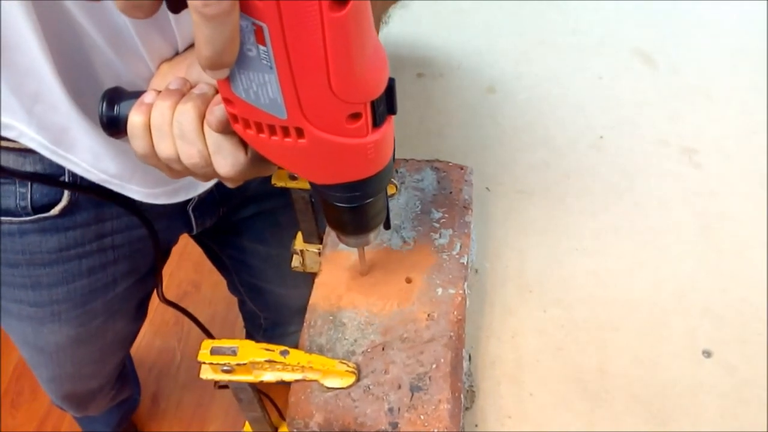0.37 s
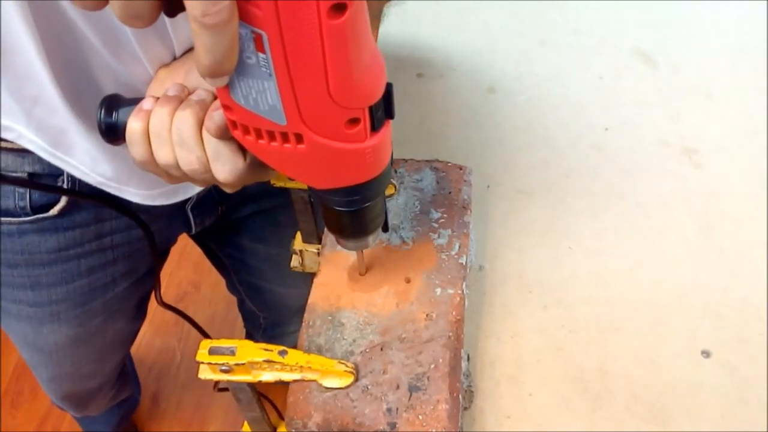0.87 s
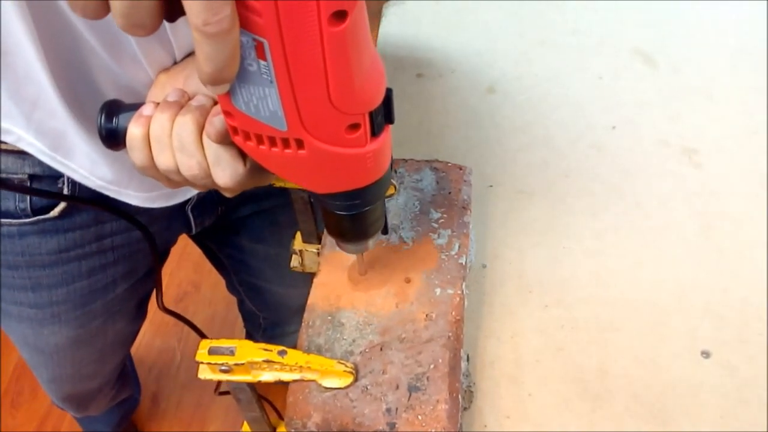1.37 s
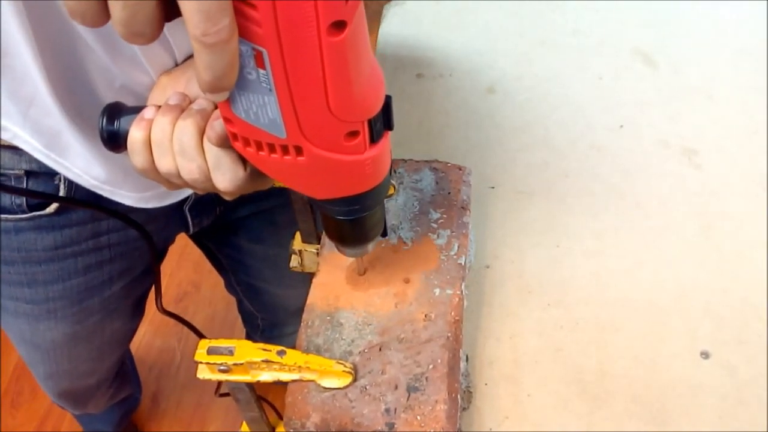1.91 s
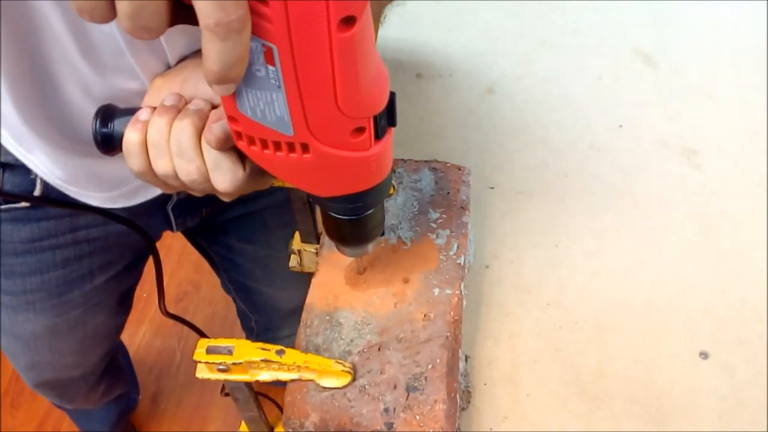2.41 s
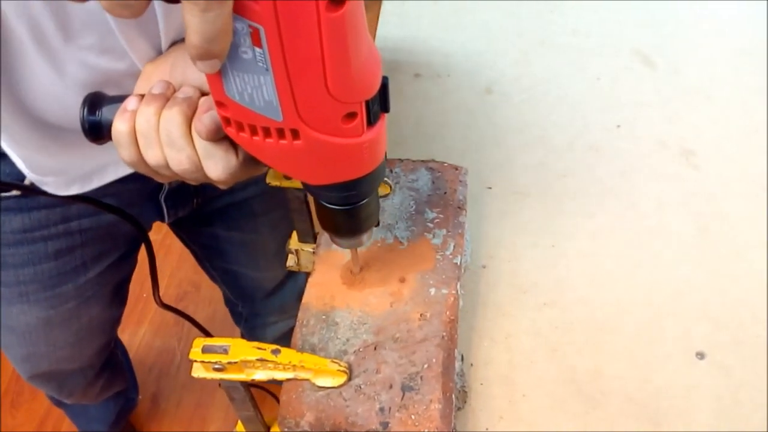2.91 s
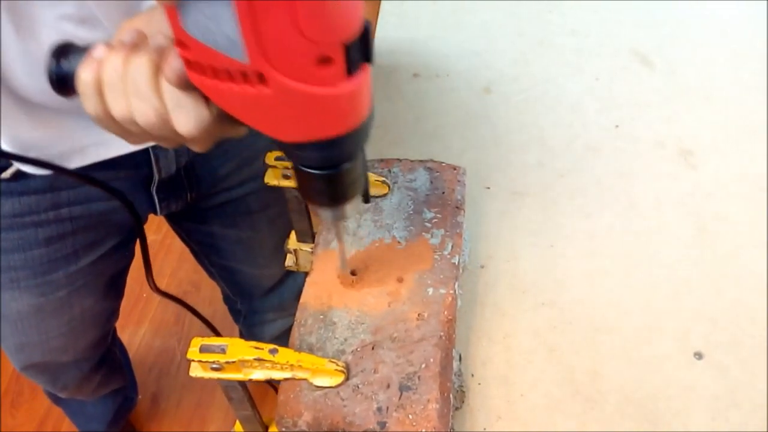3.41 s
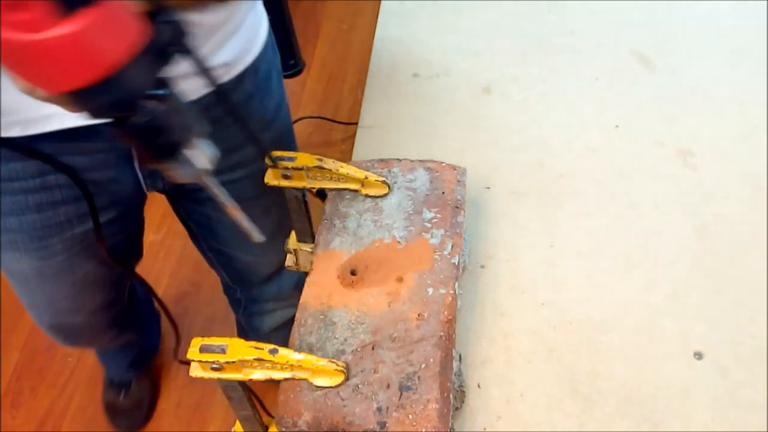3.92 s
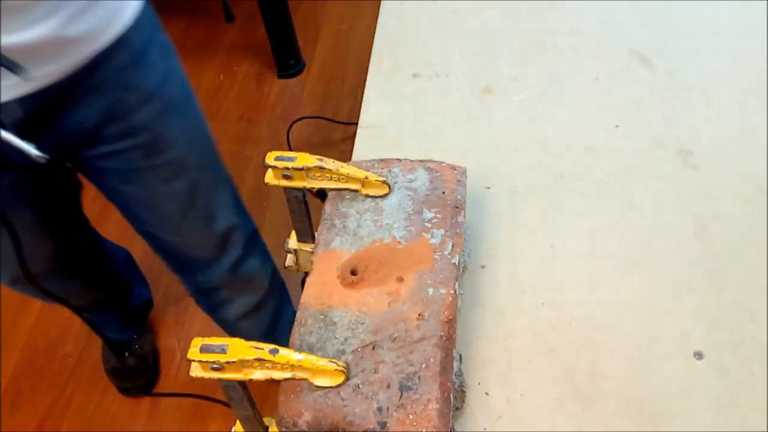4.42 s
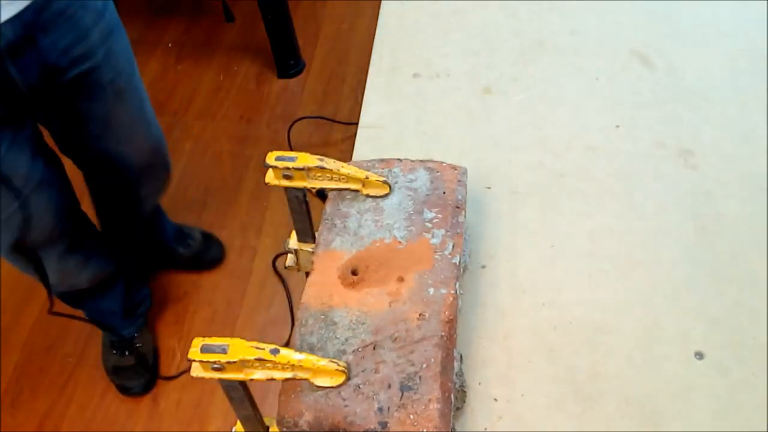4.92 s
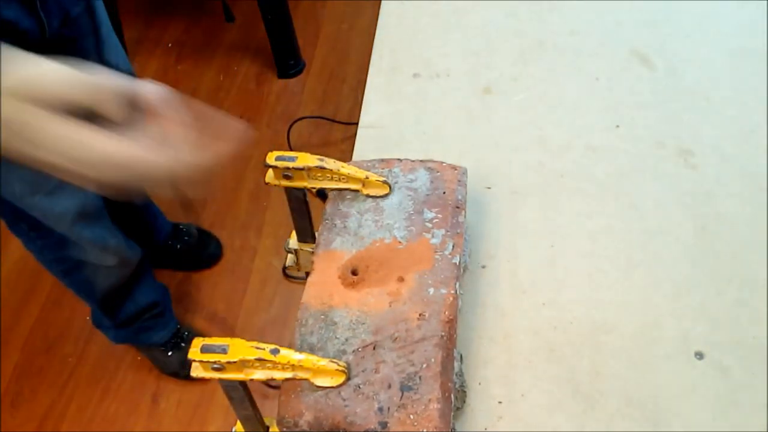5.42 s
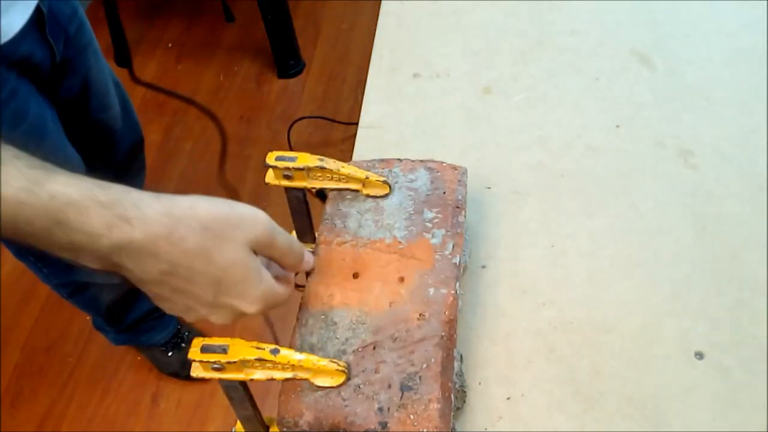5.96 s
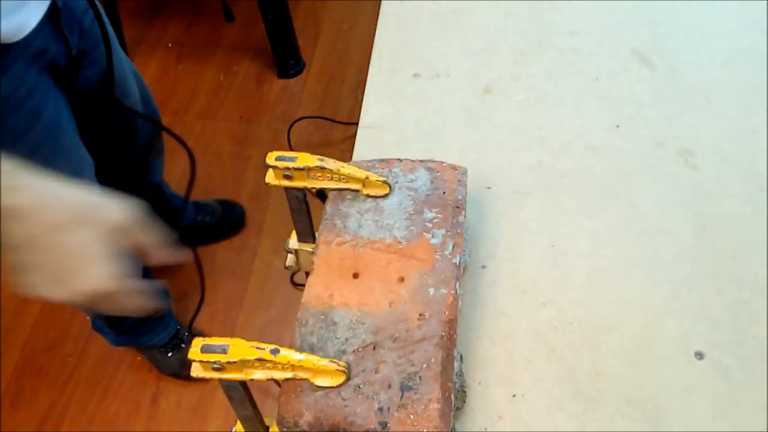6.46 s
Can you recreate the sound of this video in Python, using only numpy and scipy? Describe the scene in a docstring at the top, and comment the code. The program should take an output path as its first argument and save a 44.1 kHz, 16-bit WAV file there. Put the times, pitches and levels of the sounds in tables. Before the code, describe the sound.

Close up in a small, hard room, an electric hammer drill is already boring into brick. Until about 2 s its rapid blows merge into a steady, loud buzzing tone around 510 Hz with overtones, wrapped in bright, gritty grinding; the microphone saturates gently. From 1.9 s the tone rises slightly, breaks up and fades, with the grinding gone by 2.3 s. Between 2.1 and 2.8 s the bit squeals around 5 to 6 kHz, throbbing as it turns, while the lighter motor whirs and speeds up. Shorter, weaker squeaks continue to about 3.4 s as motor speed dips. Then gear whine and airy draught slide downward and fade, with uneven bearing ticks from about 4.3 s until nearly 6 s. Very faint, soft gritty hand strokes come near 5.9 and 6.35 s, the last followed by a faint low swell over quiet building murmur.

```python
"""An electric hammer drill bores into a clamped brick: ratchet blows sing as a steady tone over grinding noise.
The bit is drawn out, squealing against the hole in narrow bands of noise over a faint low hum; the motor's
draught, gears and whines follow its speed as it coasts to rest, slack bearings tick, and a hand sweeps off the
dust in soft strokes of filtered noise, the last followed by a faint, low, murmur-like swell.
A small hard room and a low murmur surround it; the microphone saturates gently."""
import sys
import numpy as np
from scipy import signal
from scipy.fft import rfft, irfft, next_fast_len
from scipy.io import wavfile
from scipy.ndimage import map_coordinates

SR = 44100
rng = np.random.default_rng(int(sys.argv[2]) if len(sys.argv) > 2 else 0)


def materialize(psi):
    """Save the field psi as 16-bit PCM at rate SR to the path in sys.argv[1].

    A 1-D psi becomes a single channel; in a 2-D psi each row is a channel.
    """
    bounded = np.clip(np.atleast_2d(psi).T, -1, 1)
    quanta = np.round(bounded * 32767).astype(np.int16)
    wavfile.write(sys.argv[1], SR, quanta)


def natural_amplitude(level_db):
    """Convert a level in decibels to a linear amplitude factor, elementwise."""
    exponent = np.asarray(level_db, float) / 20
    return 10 ** exponent


N = 289737
TIME = np.arange(N) / SR  # seconds
FULL_HZ = 400  # armature turns per second at which the speed laws give their stated dB


def unit(x):
    """Scaled to rms 1."""
    return x / np.sqrt(np.mean(x ** 2) + 1e-20)


def along(points, hz):
    """Values of (Hz, value) points, interpolated on a log frequency axis."""
    point_hz, values = np.transpose(points)
    return np.interp(np.log(hz + 1), np.log(point_hz + 1), values)


def curves(rows):
    """One value per sample for each column after the time."""
    seconds, *columns = np.transpose(rows)
    return [np.interp(TIME, seconds, column) for column in columns]


def wobble(rate):
    """A smooth random curve, rate knots a second."""
    knots = rng.standard_normal(int(N * rate / SR) + 4)
    return map_coordinates(knots, [TIME * rate])


def bump(peak_s, length_s):
    """A bell-shaped curve that peaks at 1; length_s is its standard deviation."""
    return np.exp(-.5 * ((TIME - peak_s) / length_s) ** 2)


def turns(hz):
    """Phase in radians of a rotation of changing speed."""
    return 2 * np.pi * np.cumsum(hz) / SR


def filtered(x, response):
    """x times a response of frequency, rms 1."""
    size = next_fast_len(N + 8192)
    spectrum = rfft(x, size) * response(np.fft.rfftfreq(size, 1 / SR))
    return unit(irfft(spectrum, size)[:N])


def coloured(x, spectrum):
    """x shaped by a (Hz, dB) spectrum, rms 1."""
    return filtered(x, lambda hz: natural_amplitude(along(spectrum, hz)))


def resonances(hz, modes):
    """Causal response of (Hz, width in Hz, dB) modes, with alternating signs."""
    response = 0
    for k, (centre, width, db) in enumerate(modes):
        mode = 1j * hz * width / (centre * centre - hz * hz + 1j * hz * width)
        response = response + (-1) ** k * natural_amplitude(db) * mode
    return response


def ringing(x, modes):
    """x through the modes twice, so that their dB and slopes double; rms 1."""
    return filtered(x, lambda hz: resonances(hz, modes) ** 2)


def fade(start, end, edge):
    """A gate from start to end that ramps over edge, all in seconds."""
    return np.clip((TIME - start) / edge, 0, 1) * np.clip((end - TIME) / edge, 0, 1)


def boring():
    """Ratchet blows sing as a steady tone; each blow also crushes brick in a burst of noise."""
    # The ratchet's blows. Each row: time in seconds, blows per second in Hz, blow tone rms in dB.
    blow_rows = [(0, 514, -22.5), (.54, 510, -21.5), (.79, 506, -23), (1.12, 509.6, -22),
                 (1.33, 508.7, -21), (1.65, 513.5, -22), (1.86, 520.4, -23.5), (1.95, 529, -22),
                 (2.02, 542, -25.5), (2.1, 547, -29), (2.16, 562, -35), (2.22, 550, -38), (2.3, 555, -49),
                 (2.45, 550, -61)]
    # Faint lines around the blow tone.
    # Each row: frequency as a ratio to the chuck rate, not always whole, rms in dB at full push, waver in dB.
    faint_lines = [(17.04, -53.5, -0.5), (47, -41, 2), (63.74, -48, 2), (64.97, -39, 0.5),
                   (81.03, -37.5, -0.5), (90.4, -50, 3), (96.3, -39, -2.5), (113.8, -44.5, 2),
                   (22.36, -55, 7), (41.2, -48.5, 1.5), (55, -57.5, 1.5), (62, -52, 3.5), (94.2, -50, 4.5)]
    # How the bench passes the overtones. Each row: frequency in Hz, level in dB over the blow tone.
    bench_gain = [(1012, -5), (1019, -13), (1029, -24), (1042, -14), (1100, -14), (1520, -12), (1545, -12),
                  (1600, -15)]
    # Teeth missing each other once the push is gone. Each row: time in seconds, level change in dB.
    skip_rows = [(1.98, -6.5), (2.046, -12), (2.075, -6.5), (2.122, -14.5), (2.235, -6.5)]
    # Bit crushing brick. Each row: frequency in Hz, relative level in dB per Hz.
    grind_spectrum = [(20, -29), (60, -23.5), (200, -22.5), (310, -9.5), (450, -24), (620, -17.5),
                      (730, -10), (1150, -13.5), (1400, -10.5), (2100, -5.5), (3300, -3.5), (4600, -4),
                      (7000, -9.5), (15800, -34.5)]
    # The steel bit's ring under the blows. Each row: centre in Hz, width in Hz, relative dB of one pass.
    bit_modes = [(2474, 200, -10), (3600, 300, -10.5), (5267, 430, -8), (6360, 500, -10.5),
                 (8990, 490, -15), (12000, 400, -23)]

    blow_hz, tone_db = curves(blow_rows)
    blow = turns(blow_hz) + .05 * wobble(60)
    chuck = blow / 16  # 16 ratchet teeth a turn

    tone = natural_amplitude(0.51 * wobble(25)) * np.sin(blow)
    for k in (2, 3):
        overtone_db = along(bench_gain, k * blow_hz) + 0.67 * wobble(11)
        tone += natural_amplitude(overtone_db) * np.sin(k * blow + k)
    skip_db = sum(db * bump(s, 0.0069) for s, db in skip_rows)
    tone *= natural_amplitude(skip_db) * natural_amplitude(tone_db)

    push = fade(-1, 2.2, .35)  # the push on the handle eases
    for ratio, db, waver_db in faint_lines:
        gain = natural_amplitude(db + waver_db * wobble(14))
        tone += push * gain * np.sin(ratio * chuck + .5 * wobble(20))

    # noise swells with each blow, and a little with each chuck turn
    bursts = (1 + .3 * np.cos(blow - 1.5)) * (1 + .08 * np.cos(chuck)) * natural_amplitude(1.2 * wobble(150))
    grind = coloured(bursts * rng.standard_normal(N), grind_spectrum)
    grind += natural_amplitude(-4.0) * ringing(bursts * rng.standard_normal(N), bit_modes)
    grind *= fade(-1, 2.33, 0.17)  # the bit leaves the bottom of the hole
    return fade(-1, 2.5, .1) * np.sqrt(2) * tone + natural_amplitude(-26) * grind


def murmur(speed_hz):
    """The building's low murmur, stronger while the motor shakes the floor."""
    # The murmur's colour. Each row: frequency in Hz, relative level in dB per Hz.
    murmur_spectrum = [(25, -30), (50, -21), (80, 3.5), (110, -4), (145, 0.5), (200, -11.5), (270, -10.5),
                       (400, -20), (900, -21.5), (2600, -33), (15800, -47)]
    # Brief swells. Each row: peak in seconds, length (standard deviation) in seconds, rise in dB.
    swell_rows = [(3.317, .06, 7.5), (5.9, 0.081, 3)]
    swell_db = sum(db * bump(s, length) for s, length, db in swell_rows)
    level = natural_amplitude(-69.5) + natural_amplitude(-67.5) * speed_hz / FULL_HZ  # at rest, plus the part that follows the motor
    return level * natural_amplitude(swell_db) * coloured(rng.standard_normal(N), murmur_spectrum)


def room(x):
    """Each frequency of the walls' answer dies at its own speed."""
    # Decay of the room. Each row: frequency in Hz, time to fall 60 dB in seconds.
    wall_decay = [(200, 0.19), (2000, 0.69), (10000, 0.16)]
    hz, t, cells = signal.stft(rng.standard_normal(SR // 2), SR, nperseg=256)
    decay_db = -60 * t / along(wall_decay, hz)[:, None]
    tail = signal.istft(cells * natural_amplitude(decay_db), SR, nperseg=256)[1]
    delayed = np.pad(x, (300, 0))  # samples before the walls answer
    return signal.fftconvolve(delayed, tail / np.linalg.norm(tail))[:N]


def speed():
    """Armature turns per second: the trigger sets it, then drag runs it down."""
    # Armature under the trigger. Each row: time in seconds, turns per second in Hz.
    trigger_rows = [(1.9, 338), (2.2, 370.7), (2.35, 391.2), (2.5, 405), (2.7, 412), (2.9, 416), (3.0, 416),
                    (3.12, 371.6), (3.25, 341.6), (3.33, 348), (3.41, 356.7)]
    # Coasting loss in Hz per second: brushes, bearings (times speed), fan (times speed squared).
    drag = (101.8, .1364, .00058)
    brushes, bearings, fan = drag
    end_s, end_hz = trigger_rows[-1]
    hz = np.linspace(end_hz, 0, num=400)
    step_s = (hz[0] - hz[1]) / (brushes + bearings * hz + fan * hz ** 2)
    coast = np.transpose([end_s + np.cumsum(step_s) - step_s[0], hz])
    return curves(np.vstack([trigger_rows[:-1], coast]))[0]


def law(speed_hz, steep_db, steep, slow_db, slow):
    """Gain of a noise that dies with speed, fast at first, then slowly: dB at FULL_HZ and power of each part."""
    share = speed_hz / FULL_HZ
    return natural_amplitude(steep_db) * share ** steep + natural_amplitude(slow_db) * share ** slow


def shudder(speed_hz):
    """A critical speed shakes gears and bearings: up to 4 dB of gain as the armature passes 122.5 Hz."""
    octaves = np.log2((speed_hz + 1) / 122.5)
    return natural_amplitude(4 * np.exp(-.5 * (octaves / 0.27) ** 2))


def motor(speed_hz):
    """Fan draught, gear teeth rattling in the case, and whines that follow the armature."""
    # Fan draught. Each row: frequency in Hz, relative level in dB per Hz.
    air_spectrum = [(100, -33.5), (250, -24), (600, -12), (1200, -9.5), (2000, -11), (3500, -8),
                    (6000, -2.5), (8000, -12), (15800, -62.5)]
    # Air at the blade tips. Each row: frequency in Hz, relative level in dB per Hz.
    hiss_spectrum = [(5000, -21), (8000, -0.5), (10000, -4.5), (12000, -12.5), (15800, -27.5)]
    # Gear case. Each row: centre in Hz, width in Hz, relative dB of one pass.
    gear_modes = [(3066, 900, -1), (3930, 880, 1.5), (5820, 1200, 4), (7045, 270, 5.5), (7020, 190, -7.5)]
    # Side load of the hole on the gears. Each row: time in seconds, gain in dB.
    rub_rows = [(2.1, 3.5), (2.19, -4.5), (2.33, -1.5), (2.55, 0.5), (2.78, -4), (2.95, -3), (3.11, -2),
                (3.3, 0.5)]

    shaft = turns(speed_hz)
    air = coloured(rng.standard_normal(N), air_spectrum) * natural_amplitude(0.41 * wobble(8.8))
    air *= law(speed_hz, steep_db=-37, steep=2.5, slow_db=-44, slow=1.86)
    hiss = coloured(rng.standard_normal(N), hiss_spectrum) * natural_amplitude(1.2 * wobble(38))
    hiss *= law(speed_hz, steep_db=-43, steep=6, slow_db=-62, slow=0.9)

    knocks = natural_amplitude(1.3 * wobble(70) + 1.7 * wobble(400)) * (1 + 0.083 * np.cos(shaft / 8.6))
    gears = ringing(knocks * rng.standard_normal(N), gear_modes)
    gears *= law(speed_hz, steep_db=-32, steep=7, slow_db=-56.5, slow=0.8)
    gears *= shudder(speed_hz) * natural_amplitude(curves(rub_rows)[0])
    return fade(1.5, 5.86, 0.23) * (air + hiss + gears + whines(shaft, speed_hz))


def whines(shaft, speed_hz):
    """Each order flutters; the higher the order, the more the brushes blur it."""
    # Commutator of 24 bars. Each row: order (multiple of armature speed), level in dB ahead of the case.
    bar_orders = [(24, -48), (48, -48), (72, -58), (96, -60)]
    # What the case lets out. Each row: frequency in Hz, gain in dB.
    case_gain = [(1300, -42), (2600, -24), (3200, -9), (4300, -7), (5300, 0), (6200, -5), (7200, -13),
                 (9000, -20), (11000, -26), (15500, -30)]

    share = speed_hz / FULL_HZ
    gains = [(k, natural_amplitude(db + along(case_gain, k * speed_hz))) for k, db in bar_orders]
    gains.append((37, natural_amplitude(-60.5) * share ** 1.6))  # 37 fan blades

    # the shaft hum drops out while the bit drags free, and dies under 293.5 turns per second
    snag = natural_amplitude(-10.5 * fade(3.02, 3.36, 0.074))
    held = snag / (1 + (293.5 / (speed_hz + 1)) ** 14)
    out = natural_amplitude(-55) * share ** 3.1 * held * np.sin(shaft + 0.13 * wobble(120))

    for k, gain in gains:
        blur = .17 * np.sqrt(k) * wobble(110) + .05 * np.sqrt(k) * wobble(900)
        audible = k * speed_hz < SR / 2  # no aliasing
        out += gain * natural_amplitude(2.8 * wobble(55)) * np.sin(k * shaft + blur) * audible
    return out


def squeals_and_hum(speed_hz):
    """Squeals of the bit in the hole and a faint low hum: narrow noise bands that throb once a chuck turn."""
    # Squeals of the bit in the hole; the two rows near 265 and 325 Hz are a faint low hum.
    # Each row: start in seconds, end in seconds, start pitch in Hz, end pitch in Hz, level in dB before the throb.
    band_rows = [(2.14, 2.36, 5120, 5360, -31.5), (2.28, 2.72, 5370, 5290, -29.5),
                 (2.65, 2.83, 5300, 4300, -37), (2.25, 2.47, 5700, 5700, -36),
                 (2.43, 2.79, 5680, 5740, -31.5), (2.52, 2.84, 6100, 6250, -36),
                 (2.15, 2.52, 3000, 3120, -41), (2.12, 2.72, 10700, 10500, -46),
                 (1.98, 2.4, 12100, 12100, -54), (2.38, 2.8, 12100, 12100, -50),
                 (2.9, 3.09, 12100, 12000, -52), (2.5, 2.68, 12500, 12700, -56),
                 (2.85, 3.0, 8700, 8700, -45.5), (2.82, 3.04, 7800, 7800, -42),
                 (3.01, 3.17, 9400, 9000, -41), (2.97, 3.11, 4100, 3980, -37),
                 (3.04, 3.37, 3050, 2720, -48), (1.98, 2.3, 9000, 9000, -49), (2.3, 2.8, 265, 270, -60),
                 (2.85, 3.38, 325, 310, -62)]
    chuck = turns(speed_hz) / 10.3  # armature turns per chuck turn
    out = np.zeros(N)
    for start, end, from_hz, to_hz, db in band_rows:
        pitch = np.interp(TIME, [start, end], [from_hz, to_hz])
        width_hz = min(.06 * from_hz, 420)  # a share of the pitch, up to a limit
        flutter = unit(wobble(width_hz)) + 1j * unit(wobble(width_hz))
        throb = 1 + .55 * np.cos(chuck + rng.uniform(-.5, .5) + .4 * wobble(8))
        band = (flutter * np.exp(1j * turns(pitch))).real
        out += natural_amplitude(db + wobble(15)) * fade(start, end, .05) * throb * band
    return out


def rattle(speed_hz):
    """Slack bearings tick unevenly as the motor slows, ring their seats and fall quiet near rest."""
    # Bearing seats. Each row: centre in Hz, width in Hz, relative dB of one pass.
    bearing_modes = [(1700, 680, -3), (2690, 460, 2), (3280, 1200, 0.5), (6500, 1100, -0.5)]
    ticks = natural_amplitude(1.1 * wobble(90) + 3.5 * wobble(700)) * rng.standard_normal(N)
    moving = np.tanh((speed_hz / 45) ** 2)  # closes below about 45 turns per second
    level = fade(4.3, 6.14, 0.17) * natural_amplitude(-59.5) * shudder(speed_hz) * moving
    return level * ringing(ticks, bearing_modes)


def sweeps_and_swell():
    """Strokes of a hand on gritty brick, then a low swell: bell-shaped bursts of uneven band-passed noise."""
    # Strokes of the hand, and last a faint, low, murmur-like swell of noise.
    # Each row: peak in seconds, length (standard deviation) in seconds, peak level in dB, centre in Hz.
    burst_rows = [(5.89, 0.053, -71, 4400), (5.87, 0.037, -73, 6400), (6.35, 0.049, -78, 4800),
                  (6.42, .11, -79, 720)]
    out = np.zeros(N)
    for s, length, db, hz in burst_rows:
        uneven = natural_amplitude(2.0 * wobble(300)) * rng.standard_normal(N)
        out += natural_amplitude(db) * bump(s, length) * ringing(uneven, [(hz, 0.57 * hz, 0)])
    return out


def scene():
    """The drill, the hand, their room and the building's low murmur, alike in both channels."""
    speed_hz = speed()
    close = boring() + motor(speed_hz) + squeals_and_hum(speed_hz) + rattle(speed_hz) + sweeps_and_swell()
    mix = close + natural_amplitude(-17) * room(close) + murmur(speed_hz)
    return np.tile(mix, (2, 1))


def top_cut(x):
    """Nothing passes above the cut-off."""
    return signal.sosfilt(signal.butter(12, 15920, fs=SR, output="sos"), x)


def record(dry):
    """The microphone input rounds off the strongest peaks, then a steep low-pass limits the band."""
    soft = dry / (1 + np.abs(dry / .205) ** 6) ** (1 / 6)  # ceiling at .205
    low_pass = signal.ellip(12, .2, 70, 15700, fs=SR, output="sos")  # ripple dB, stop dB, edge Hz
    finished = signal.sosfilt(low_pass, soft)
    return top_cut(finished)


dry = scene()
out = record(dry)
materialize(out)
```